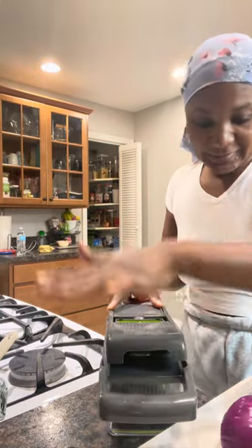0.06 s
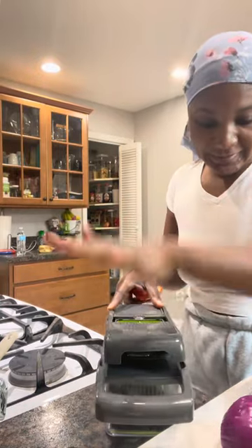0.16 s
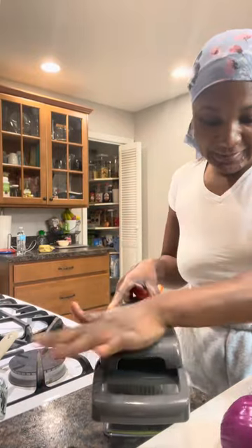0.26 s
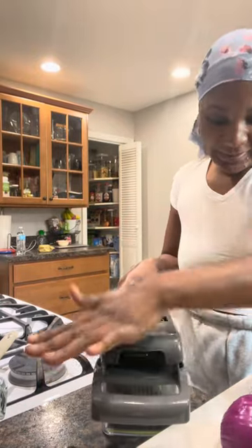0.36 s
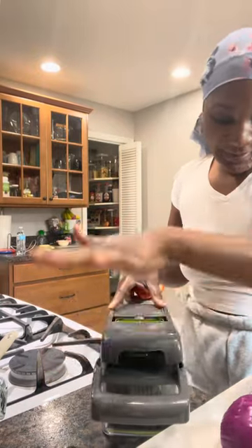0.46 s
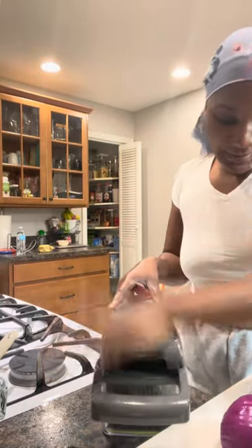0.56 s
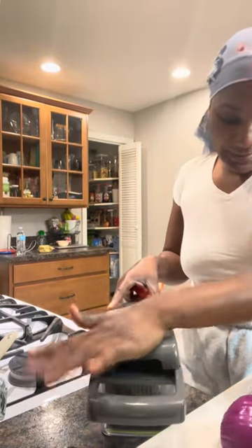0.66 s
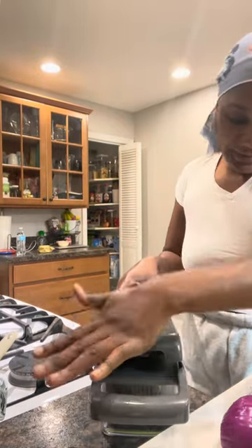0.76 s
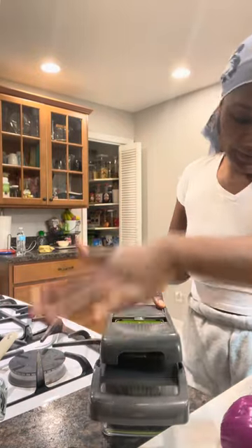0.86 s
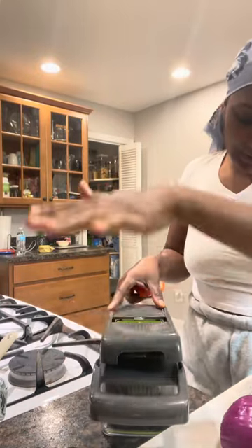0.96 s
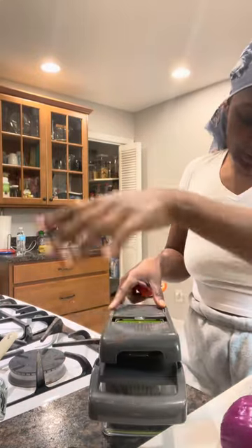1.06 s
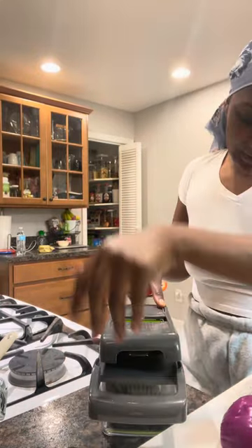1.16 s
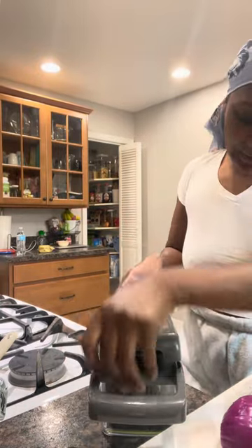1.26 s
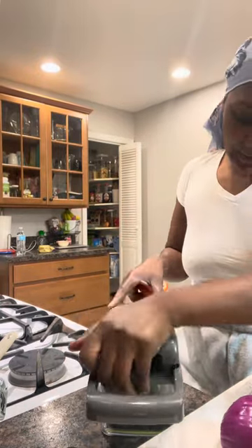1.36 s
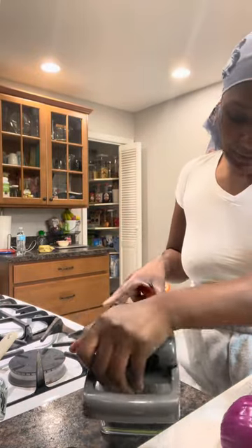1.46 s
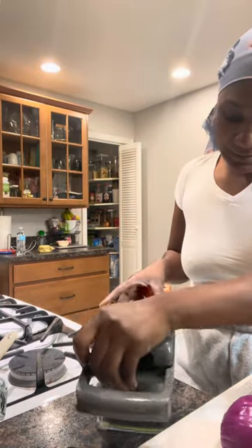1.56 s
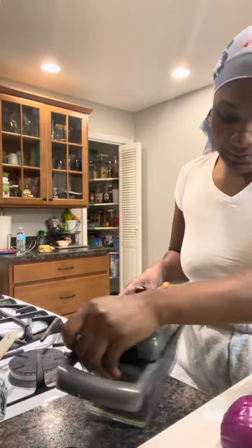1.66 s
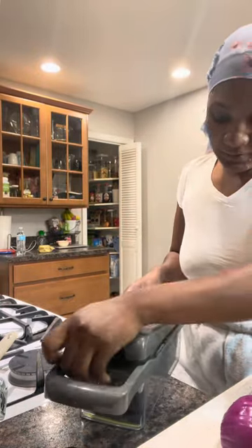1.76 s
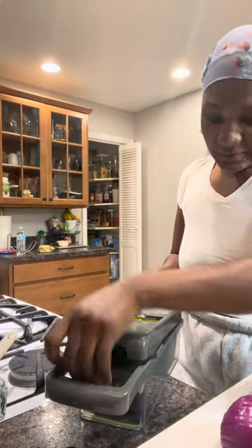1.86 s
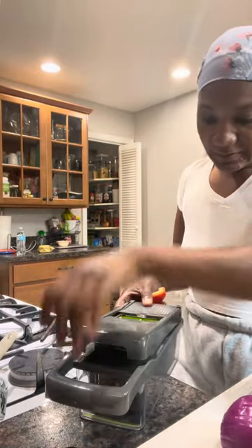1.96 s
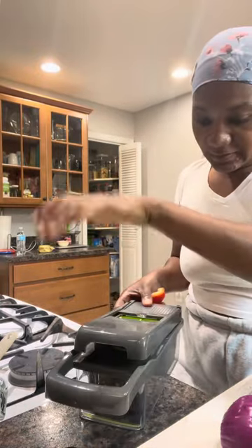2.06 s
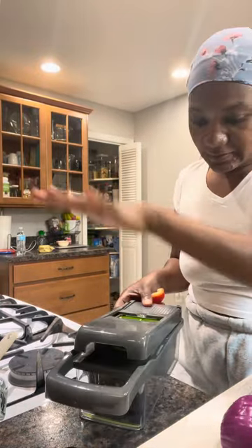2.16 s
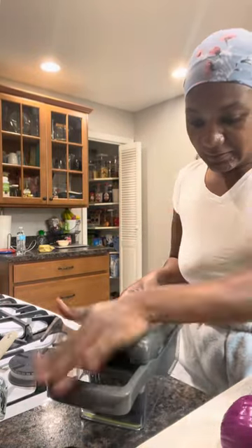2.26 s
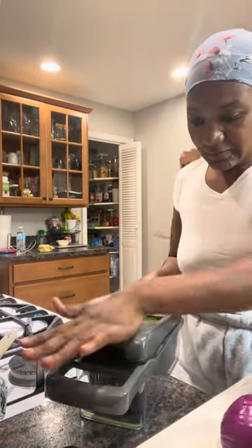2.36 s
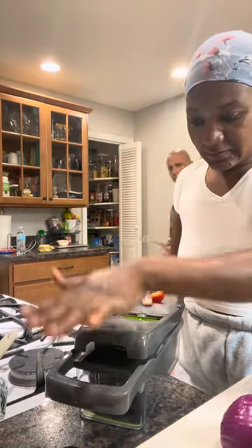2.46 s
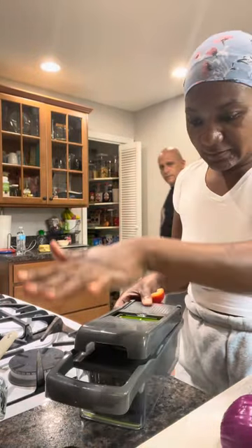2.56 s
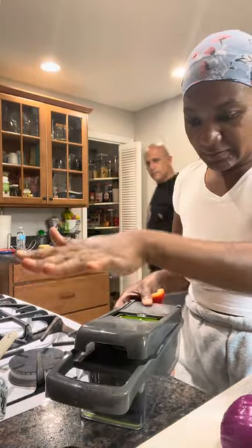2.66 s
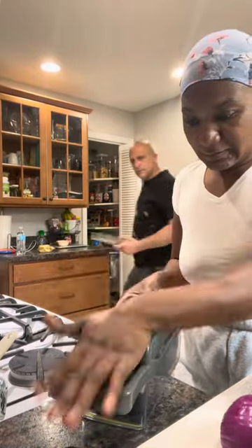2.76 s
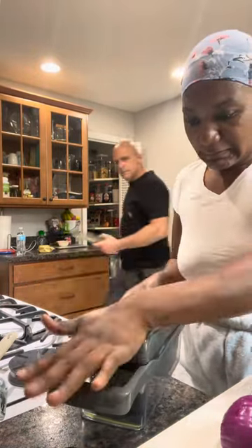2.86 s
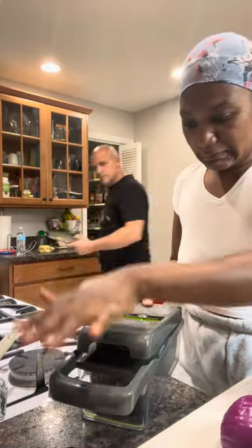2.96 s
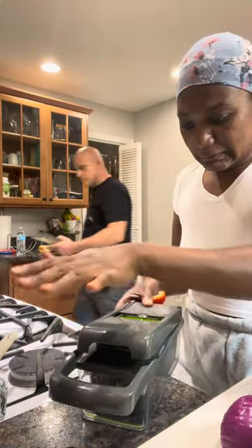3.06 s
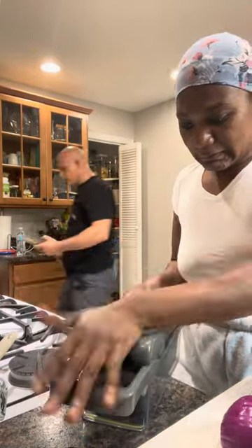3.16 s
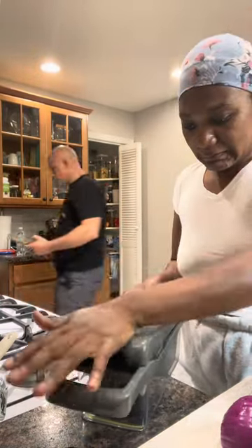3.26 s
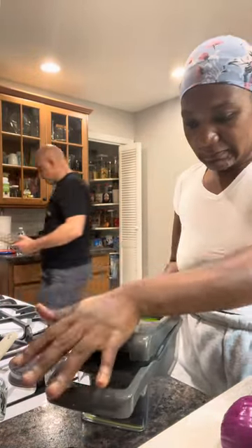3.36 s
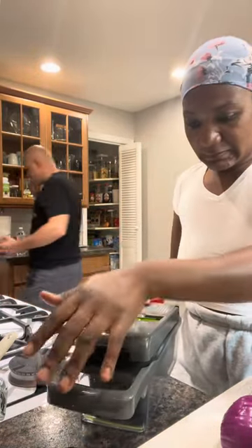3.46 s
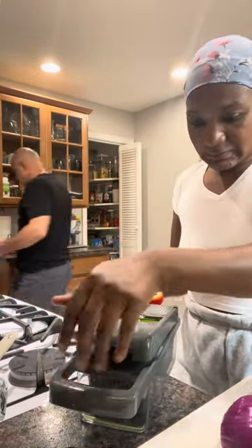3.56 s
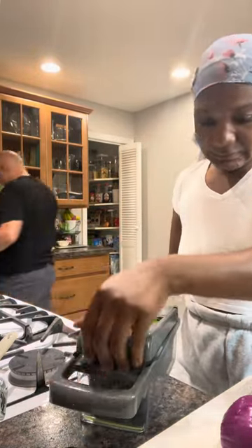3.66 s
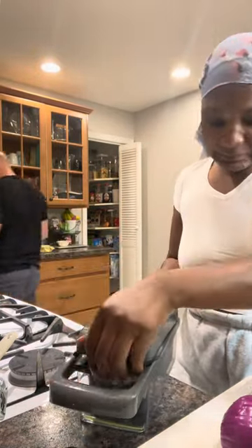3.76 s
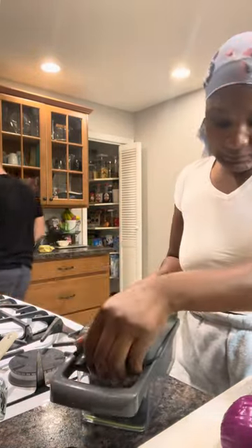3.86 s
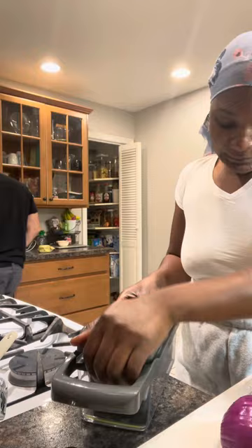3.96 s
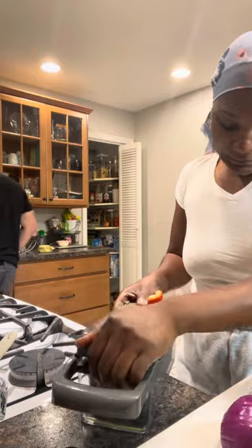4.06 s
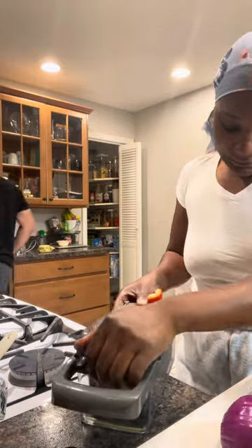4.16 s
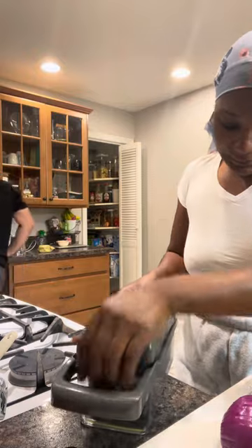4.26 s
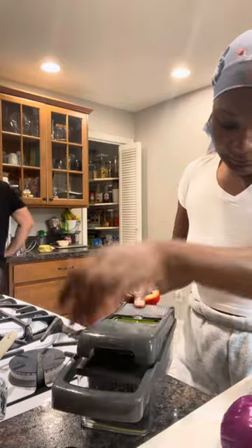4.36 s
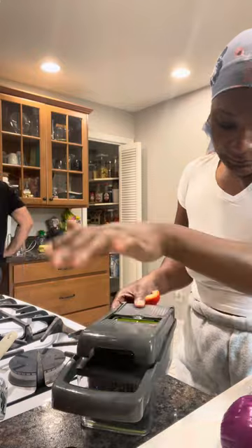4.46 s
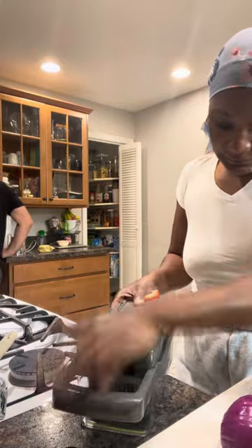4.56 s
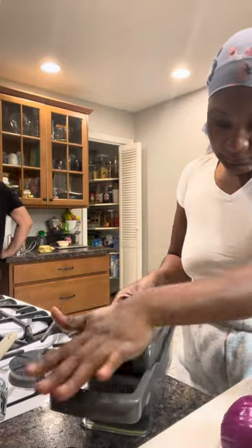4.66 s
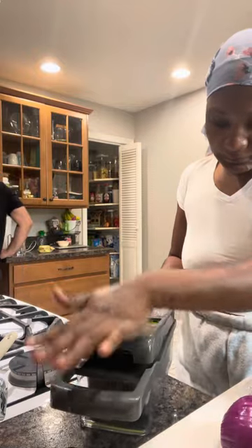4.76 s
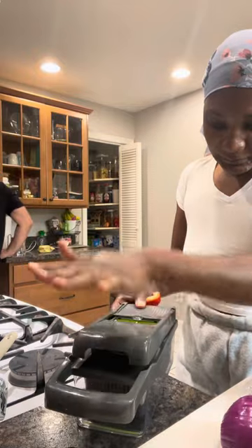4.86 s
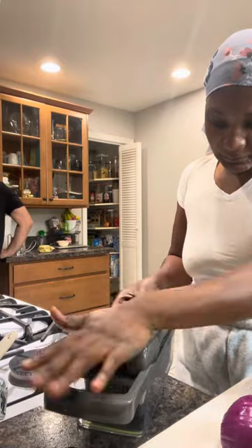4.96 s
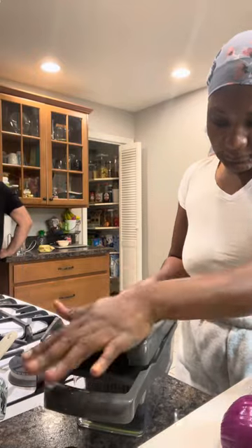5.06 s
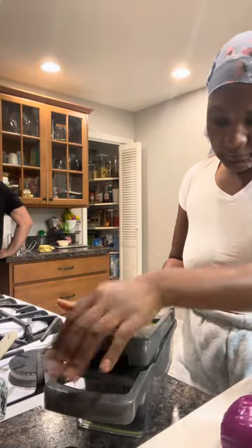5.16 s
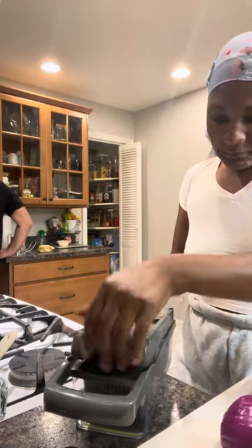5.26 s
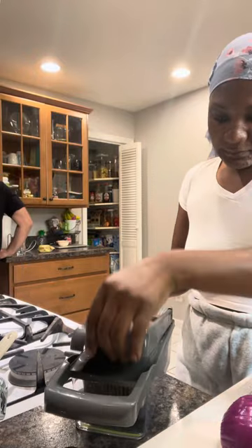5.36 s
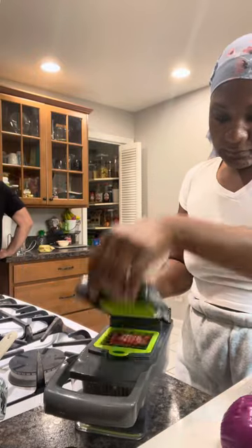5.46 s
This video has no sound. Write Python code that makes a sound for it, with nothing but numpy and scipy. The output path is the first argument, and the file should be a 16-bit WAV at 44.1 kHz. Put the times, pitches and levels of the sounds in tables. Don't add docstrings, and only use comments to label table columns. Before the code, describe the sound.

Hard crackling bangs of a plastic hand chopper on a kitchen counter, boomy thuds and short room ring, rebounds and scuffs over faint hum.

```python
import sys
import numpy as np
from scipy import signal
from scipy.fft import rfft, irfft, next_fast_len
from scipy.io import wavfile
from scipy.ndimage import uniform_filter1d

SR = 44100
rng = np.random.default_rng(int(sys.argv[2]) if len(sys.argv) > 2 else 0)


def digitize_waveform(pressure):
    field = np.atleast_2d(pressure).T
    bounded = np.clip(field, -1, 1)
    quanta = np.round(bounded * 32767).astype(np.int16)
    wavfile.write(sys.argv[1], SR, quanta)


def rack_gain(trim_db):
    fader = np.asarray(trim_db, float)
    return 10 ** (fader / 20)


N = 243032
LEAD_IN = SR // 2
CAVITY_HZ, CAVITY_T60_S = 414.4, 0.15


def evened(x):
    return x / np.sqrt(np.mean(x ** 2) + 1e-20)


def read(points, hz, axis=1):
    columns = np.transpose(points)
    return np.interp(np.log(hz + 1), np.log(columns[0] + 1), columns[axis])


def add(mix, s, sound):
    part = mix[..., LEAD_IN + round(s * SR):][..., :sound.shape[-1]]
    part += sound[..., :part.shape[-1]]


def colour(gain_db):
    log = np.log(rack_gain(np.maximum(gain_db, -100)))
    full = np.concatenate([log, log[-2:0:-1]])
    return np.fft.ifft(np.exp(full - 1j * signal.hilbert(full).imag)).real[:2048]


def band(low_hz, high_hz):
    # (pitch_hz, level_db)
    crack_colour = [(88, -28.5), (150, -1), (611, -5.5), (847, 6), (1540, -10.5), (1830, -3), (2440, -15),
                    (2690, -10), (4610, -12.5), (5070, -14), (6270, -15.5), (9030, -19), (13000, -22),
                    (14900, -43.5)]
    hz = np.fft.rfftfreq(8192, 1 / SR) + 1
    edges_db = 10 * np.log10((1 + (low_hz / hz) ** 4) * (1 + (hz / high_hz) ** 4))
    return colour(read(crack_colour, hz) - edges_db)


def ring(modes, pitch, damping):
    t = np.arange(4096) / SR
    out = sum(rack_gain(db - 60 * t / (t60 * damping)) * np.sin(2 * np.pi * hz * pitch * t)
              for hz, db, t60 in modes)
    return out / np.linalg.norm(out)


def rattle(length, rise, fall, spread_db):
    t = np.arange(6000) / SR - 40 / 1000
    before = np.minimum(t + length / 2, 0)
    after = np.maximum(t - length / 2, 0)
    shape = np.exp(before / rise - after / fall)
    sizes_db = spread_db * np.minimum(rng.exponential(1, 6000), 5)
    snaps = rng.standard_normal((2, 6000)) * rack_gain(sizes_db)
    return snaps / np.sqrt(np.mean(snaps ** 2)) * shape


def struck(drive, body, db):
    out = signal.fftconvolve(drive, body[None], axes=1)
    top = uniform_filter1d(out ** 2, 300, axis=1).max(axis=1, keepdims=True)
    return rack_gain(db) * out / np.sqrt(top)


def hum():
    # (pitch_hz, level_db)
    hum_colour = [(15, -32), (25, -9.5), (71, 2.5), (112, 0.5), (207, -14.5), (256, -5.5), (541, -29.5),
                  (808, -26.5), (1270, -31.5), (2000, -33), (2350, -37), (7840, -47.5), (14900, -60)]
    frames, hz = N // 256 + 5, np.fft.rfftfreq(1024, 1 / SR)
    a, b, c, d, patches = rng.standard_normal((frames, 513, 5)).T
    patches = uniform_filter1d(patches, 8, axis=0)
    patches = evened(uniform_filter1d(patches, 12, axis=1))
    z = np.array([a + 1j * b, c + 1j * d]) * rack_gain(read(hum_colour, hz)[:, None] + 2.2 * patches)
    return rack_gain(-56.5) * evened(signal.istft(z, nperseg=1024, noverlap=768)[1][:, :N])


def kitchen(x, early_db, early_share):
    # (pitch_hz, level_db, t60_s)
    walls = [(100, 0, 1), (200, -11.5, 0.59), (390, 3, .55), (636, -2.5, 0.39), (1005.5, -6, 0.58),
             (1600, -1.5, 0.47), (2160, 1.5, .52), (3300, 0, .48), (4200, 0.5, .48), (5640, -3, 0.48),
             (8800, -2, 0.46), (15100, -4, 0.37)]
    hz, t, z = signal.stft(x, SR, nperseg=512, noverlap=384)
    power = (abs(z) ** 2).mean(0)
    fine = uniform_filter1d(power, size=3, axis=0)
    coarse = uniform_filter1d(power, size=6, axis=0)
    power = np.where(hz[:, None] < 1300, fine, coarse)
    power = np.roll(power, 3, axis=1)
    stored = np.zeros_like(power)
    for share, db in ((1, 0), (early_share, early_db)):
        keep = rack_gain(-2 * 60 * (t[1] - t[0]) / (share * read(walls, hz, axis=2)))
        piled = [signal.lfilter([1 - k], [1, -k], p) for k, p in zip(keep, power)]
        stored += rack_gain(2 * db) * np.array(piled)
    a, b = rng.standard_normal((len(t), len(hz), 2, 2)).T
    modes_db = 1.4 * rng.standard_normal(len(hz))
    field = (a + 1j * b) * np.sqrt(abs(stored)) * rack_gain(read(walls, hz) + modes_db)[:, None]
    return signal.istft(field, SR, nperseg=512, noverlap=384)[1][:, :x.shape[1]]


def rubs(box):
    # (top_s, swell_s, fade_s, drag_db, scuff_over_drag_db)
    slides = [
        (1.309, .012, 0.057, -47, -24),
        (1.495, .05, .3, -65.5, -1),
        (1.705, 0.13, 0.022, -64, -14),
        (2.004, 0.12, 0.094, -70, 9),
        (3.977, .004, .12, -53, -0.5),
        (4.1, 0.19, 0.31, -84, -6),
        (4.285, 0.072, 0.14, -48, -11.5),
        (4.41, 0.016, 0.14, -39.5, -11),
        (5.205, 0.0063, 0.05, -43.5, -30),
        (5.344, 0.044, 0.066, -43.5, -10),
    ]
    # (top_s, swell_s, fade_s, hiss_db)
    wipes = [
        (1.55, .35, .3, -81.5),
        (1.95, .2, .3, -73.5),
        (2.55, .3, .3, -70.5),
        (3.83, 0.13, 0.14, -69.5),
        (4.0, .04, .15, -75),
        (4.277, 0.066, 0.092, -65),
        (5.262, 0.048, 0.298, -55.5),
        (5.499, .3, .2, -63),
    ]
    parts = [signal.butter(4, edges, "bandpass", fs=SR, output="sos")
             for edges in ([200, 720], [700, 3200], [3800, 11000])]
    strokes = [(*when, (db, db + scuff_db, db - 40)) for *when, db, scuff_db in slides]
    strokes += [(*when, (db - 6.5, db - 4, db)) for *when, db in wipes]
    stroke_depth_db = 25
    t = np.arange(SR) / SR - .5
    for top, swell, fade, levels_db in strokes:
        slips = rng.standard_normal((2, SR)) * rack_gain(0.83 * rng.exponential(1, SR))
        sound = sum(rack_gain(db - 8.0) * evened(signal.sosfilt(part, slips))
                    for part, db in zip(parts, levels_db))
        shape = rack_gain(-stroke_depth_db * np.maximum(-t / swell, t / fade))
        add(box, top - .5, sound * shape)


def hollow_ring(box, s, db, ring_hz, fall):
    body = ring([(ring_hz, 0, .02 + 8 / ring_hz)], 1, 1)
    add(box, s - 39 / 1000, struck(rattle(0.00377, 0.0036, fall, 0.69), body, db))


def grips(box):
    # (start_s, level_db, wall_pitch_ratio, tilt_db_per_octave)
    grabs = [
        (1.04, -54, 1.02, -8),
        (1.148, -55, 1.04, -20),
        (1.273, -37, .98, -3.5),
        (1.735, -32, 1.08, -4.5),
        (3.486, -38.5, .94, 0),
    ]
    # (pitch_hz, level_db, dying_time_s)
    handle = [(830, 2.5, 0.0089), (1540, 0, .006), (2230, -4.5, 0.005), (3970, -13, 0.004)]
    for s, db, pitch, tilt_db in grabs:
        hollow_ring(box, s, db, CAVITY_HZ, 0.0057)
        for hz, wall_db, fall in handle:
            tilted_db = db + wall_db + tilt_db * np.log2(hz / CAVITY_HZ)
            hollow_ring(box, s, tilted_db, hz * pitch, fall)


def thud():
    # (pitch_hz, width_hz)
    counter = [(29, 41), (72.4, 18.7), (110.8, 17.9)]
    delay_s, strength = .013, 1.63
    hz = np.fft.rfftfreq(16384, 1 / SR)
    out = 1 + strength * np.exp(-2j * np.pi * hz * delay_s)
    for centre_hz, width in counter:
        out = out * 1j * hz * width / (centre_hz ** 2 - hz ** 2 + 1j * hz * width)
    wave = irfft(out)[:12000]
    return wave / abs(wave).max()


def knocks(box, bass):
    # (start_s, peak_db, ring_hz, hardness_db, dying_time_s)
    contacts = [(.309, -45.5, 1697, 1.5, 0.066), (.338, -30, 658, -18.5, 0.011),
                (0.719, -39, 830, -15, 0.0042), (.749, -39.5, 648, -16, 0.01),
                (1.033, -56, 810, -11, 0.0067), (1.142, -57, 1000, -31, 0.0054),
                (1.271, -40.5, 665, -11.5, 0.029), (1.342, -49, 650, -20, 0.017),
                (1.414, -56.5, 495, -32, 0.0079), (1.58, -65, 837, -23, 0.0058),
                (1.731, -28, 817, -16, 0.0093), (1.851, -42.5, 609, -37, 0.0082),
                (1.906, -46, 800, -22.5, 0.0063), (2.375, -36.5, 615, -14.5, 0.02),
                (2.398, -39, 824, -11, 0.0061), (3.472, -37.5, 740, -16, 0.0071),
                (3.481, -32, 644, -12.5, 0.0042), (3.777, -65, 825, -24, .012), (4.003, -80, 648, 5, 0.011),
                (4.275, -50.5, 644, -11, 0.0036), (4.297, -50.5, 640, -20, .008),
                (5.283, -64.5, 645, 3.5, 0.011), (5.347, -44, 823, -13, 0.0043)]
    # (start_s, level_db, ring_hz, dying_time_s)
    hollows = [(1.64, -63, 820, 0.0075), (1.739, -36, 217, .004), (2.87, -48.5, 860, 0.029),
               (3.21, -27, 847, 0.023), (3.467, -36.5, 763, .0074), (4.03, -82, 3300, .033),
               (4.1, -78, 2860, 0.11), (4.25, -42, 229, 0.017), (4.408, -35, 329, 0.02),
               (4.431, -85, 2970, .037), (4.643, -51.5, 410, .068), (4.698, -38, 170, .022),
               (4.999, -41.5, 328, 0.01)]
    # (start_s, thud_db)
    bumps = [(0.328, -49), (0.681, -48), (0.858, -43.5), (1.284, -42), (1.322, -44), (1.738, -31.5),
             (1.862, -44), (2.382, -41.5), (3.471, -53.5), (4.004, -43), (4.412, -53), (4.716, -39.5),
             (5.188, -50.5), (5.252, -44.5)]
    hollow, middle, treble = band(680, 1100), band(890, 3700), band(4200, 18000)
    cavity = ring([(CAVITY_HZ, 0, CAVITY_T60_S)], 1, 1)
    for s, peak_db, ring_hz, hard_db, fall in contacts:
        start = s - 39 / 1000
        snaps = rattle(0.0017, .0016, fall, 6)
        add(box, start, struck(snaps, ring([(ring_hz, 0, .03)], 1, 1), peak_db))
        wall_db = peak_db + 0.78 * hard_db + 3.5
        add(box, start, struck(snaps, hollow, peak_db - 3.5))
        add(box, start, struck(snaps, middle, wall_db))
        tick = rattle(0.0023, 0.00086, 0.41 * fall, 1.2)
        add(box, start, struck(tick, treble, peak_db + hard_db - 6))
        add(box, s - 34 / 1000, struck(snaps, cavity, peak_db - 9))
    for row in hollows:
        hollow_ring(box, *row)
    for s, thud_db in bumps:
        add(bass, s, rack_gain(thud_db) * thud())


def blows(box, bass):
    landings = [
        -.19,
        .2062,
        .5997,
        2.2407,
        2.7322,
        3.1647,
        4.562,
        4.9452,
    ]
    # (crack_db, crack_length_s, thud_db, early_slap_db, juice_spray_db)
    palm_blows = [
        (-14, 0.018, -14, -40, -48.5),
        (-12, 0.0064, -10, -37.5, -56),
        (-15, .012, -9.5, -27, -54),
        (-14.5, 0.018, -12.5, -31, -32),
        (-15.5, .011, -12, -32, -36.5),
        (-14, .01, -10, -31.5, -31),
        (-14.5, 0.0091, -9, -38.5, -27.5),
        (-18.5, 0.014, -11, -39.5, -33),
    ]
    # (box_hz, lid_hz, lid_db, rim_hz, rim_db); the first serves two blows
    palm_rings = [(455, 828, -13.5, 1440, -13), (300, 829, -18, 1100, -4), (426.5, 1000, -18, 1360, -11.5),
                  (463, 830, -13.5, 1380, -10.5), (320, 660, -18, 1500, -13),
                  (328, 835, -12.5, 1300, -10.5), (335, 711, -19.5, 1400, -12.5)]
    # (pitch_hz, level_db, t60_s)
    blade_grid = [(1730, -2.5, 0.01), (2016, -3.5, 0.083), (2810, -1, 0.057), (3660, -4.5, 0.049),
                  (3720, -2.5, 0.053), (4770, -7.5, 0.014)]
    bright, skin, fine = band(1500, 10500), band(810, 2400), band(11500, 14500)
    for s, blow, rings in zip(landings, palm_blows, palm_rings[:1] + palm_rings):
        crack_db, length, thud_db, slap_db, spray_db = blow
        box_hz, lid_hz, lid_db, rim_hz, rim_db = rings
        start = s - .008 + .3 * length - 40 / 1000
        slap = rattle(0.0069, 0.0028, 0.0033, 1.8)
        add(box, start - .011, struck(slap, skin, slap_db))
        crack = rattle(0.81 * length, .0014, 0.0045, 3.7)
        add(box, start, struck(crack, bright, crack_db))
        blades = rattle(0.2 * length, 0.00095, 0.0043, 4.2)
        add(box, start, struck(blades, ring(blade_grid, 0.96, 1.0), crack_db - 7.0))
        spray = rattle(.5 * length, .0015, 0.0038, 3.7)
        add(box, start, struck(spray, fine, spray_db))

        rim = ring([(rim_hz, 1, 0.03), (1200, -3.3, .018)], 0.97, 1)
        add(box, start - .001, struck(rattle(.45 * length, 0.0023, 0.0026, 2.9), rim, rim_db - 5))
        lid = ring([(lid_hz, 0, .04)], 1, 0.79)
        add(box, start + .002, struck(rattle(0.67 * length, 0.00083, 0.0027, 0.7), lid, lid_db + 0.5))
        shell = ring([(box_hz, 0, .035)], 1.0, 0.99)
        add(box, start + 0.0032, struck(rattle(1.2 * length, 0.0031, 0.0043, 1.0), shell, thud_db - 11))
        cavity = ring([(box_hz, 0, CAVITY_T60_S)], 0.96, 0.88)
        add(box, s - .03, struck(rattle(0.032, 0.013, 0.023, 0.88), cavity, thud_db - 22))
        push = rattle(0.0053, 0.001, 0.013, 1.2)
        add(box, s - .04, struck(push, band(240, 650), thud_db - 10.5))
        add(bass, s, rack_gain(thud_db) * thud())


def scene():
    box, light = np.zeros((2, LEAD_IN + N)), np.zeros((2, LEAD_IN + N))
    bass = np.zeros(LEAD_IN + N)
    blows(box, bass)
    knocks(light, bass)
    grips(light)
    rubs(light)
    to_room = box + rack_gain(-1) * light + rack_gain(-8.0) * bass
    wet = rack_gain(-8.5) * kitchen(to_room, -0.11, 0.39)
    return (box + light + bass + wet)[:, LEAD_IN:] + hum()


def band_limit(x):
    return signal.sosfilt(signal.butter(12, 15040, fs=SR, output="sos"), x)


def record(dry):
    # (pitch_hz, likeness_0_to_1, left_lead_radians, left_minus_right_db)
    ports = [(90, .999, 0, -.6), (180, .99, .1, -.6), (300, .96, .1, -.5), (480, .7, -.6, -4),
             (850, .6, 2.2, -7), (1500, .5, 1.5, -1.5), (3800, .35, .8, -2.8), (5400, .75, .7, -2.4),
             (6300, .955, .2, -1.2), (7600, .965, .2, 0), (9200, .93, 1.4, .2), (11500, .97, 2.2, .2),
             (13500, .98, 2.55, .2), (15000, .99, 3.0, .2)]
    size = next_fast_len(N + 4096)
    hz = np.fft.rfftfreq(size, 1 / SR)
    first, other = rfft(dry, size)
    same = np.clip(read(ports, hz), 0, 1)
    tilt = rack_gain(read(ports, hz, axis=3) / 2)
    shift = np.exp(-1j * read(ports, hz, axis=2))
    right = same * shift * first + np.sqrt(1 - same ** 2) * other
    low_cut = hz ** 2 / np.hypot(hz ** 2, 36 ** 2)
    pair = irfft(np.array([first * tilt, right / tilt]) * low_cut, size)[:, :N]
    top_cut = 1 / np.hypot(1, (hz / 15700) ** 30)
    pair = irfft(rfft(np.tanh(pair), size) * top_cut, size)[:, :N]
    return band_limit(pair)


dry = scene()
out = record(dry)
digitize_waveform(out)
```